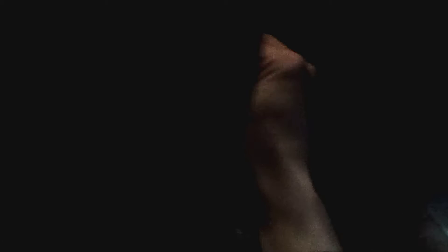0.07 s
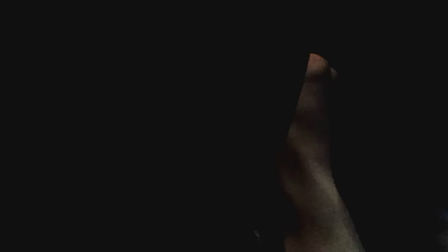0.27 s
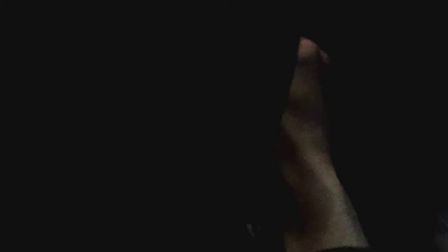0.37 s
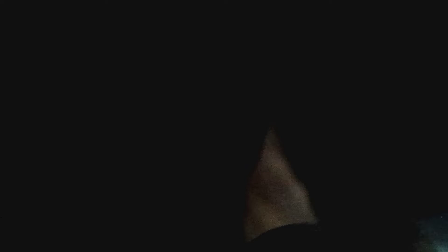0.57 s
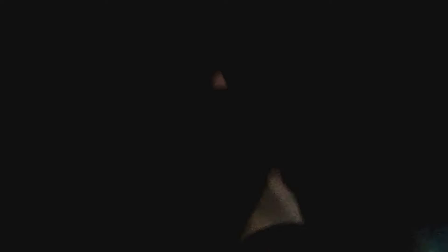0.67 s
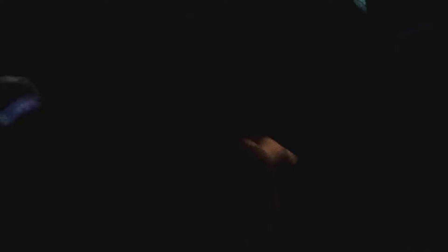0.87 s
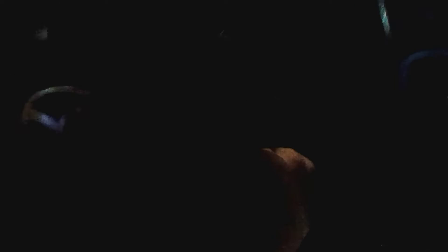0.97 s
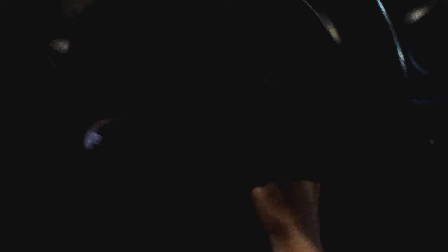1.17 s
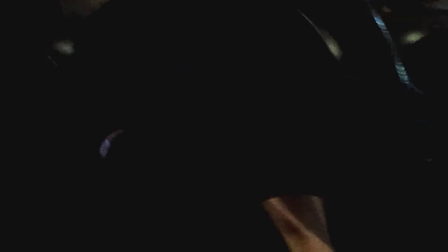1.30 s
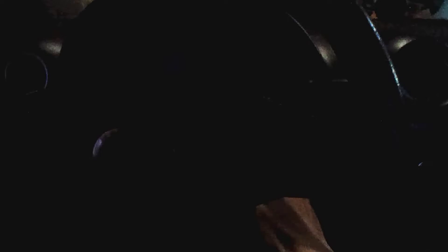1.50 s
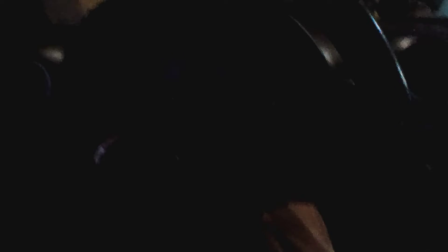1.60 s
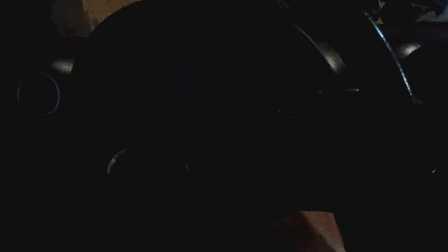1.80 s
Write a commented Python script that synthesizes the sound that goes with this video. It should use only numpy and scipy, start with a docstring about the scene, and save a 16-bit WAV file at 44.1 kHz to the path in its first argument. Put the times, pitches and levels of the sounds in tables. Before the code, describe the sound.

Keys click and jingle close to the microphone in a quiet parked car. A sleeve rustles, one key scrapes into the lock, then dull bumps, two sharp snaps and a last loose rattle follow.

```python
"""A faint sinking hum and the rustle of a sleeve open on keys handled close by in a parked car.
The keys click against the lock, each impact exciting crowded modes of metal and housing. One key
scrapes in by stick-slip friction while the others ring. Dull bumps on a damped panel follow, then
two sharp snaps and a last loose rattle over the hush of the cabin."""
import sys
import numpy as np
from scipy import signal
from scipy.fft import rfft, irfft
from scipy.io import wavfile

SR = 44100
rng = np.random.default_rng(int(sys.argv[2]) if len(sys.argv) > 2 else 0)


def put_to_file(sound):
    """Save the sound as 16-bit audio at rate SR, in the file named by the first command-line argument."""
    columns = np.atleast_2d(sound).T  # one column per channel
    safe = np.clip(columns, -1, 1)
    whole_steps = np.round(safe * 32767)
    wavfile.write(sys.argv[1], SR, whole_steps.astype(np.int16))


N = 81585
T = np.arange(N) / SR
HZ = np.fft.rfftfreq(N, 1 / SR)
EVENT_T = T[:SR // 4]  # time since an impact [s]


def amp(db):
    """Amplitude ratio of a level in decibels."""
    return 10 ** (np.asarray(db) / 20)

def decay(t60):
    """Exponential damping: 60 dB in t60 seconds."""
    return np.exp(-np.log(1000) * EVENT_T / t60)

def unit_rms(x):
    """Normalisation to unit power."""
    return x / np.sqrt(np.mean(x ** 2) + 1e-20)

def spectrum_db(table):
    """Interpolation of levels over logarithmic frequency."""
    hz, db = np.transpose(table)
    return np.interp(np.log(HZ + 1), np.log(hz + 1), db)

def envelope(table, column=1):
    """Amplitude envelope, interpolated in decibels."""
    rows = np.array(table)
    return amp(np.interp(T, rows[:, 0], rows[:, column]))

def add(mix, onset, sound):
    """Superposition of a sound at its onset time."""
    part = mix[:, round(onset * SR):][:, :sound.shape[-1]]
    part += sound[..., :part.shape[-1]]

def noise(spectrum, correlation=0.2):
    """Filtered Gaussian noise, partly coherent between the channels."""
    left, independent = rng.standard_normal((2, N))
    right = correlation * left + np.sqrt(1 - correlation ** 2) * independent
    return unit_rms(irfft(rfft(np.array([left, right])) * amp(spectrum_db(spectrum)), N))

def phase_drift(width_hz, shape):
    """Line broadening: a random walk of phase, in cycles, widens a tone to width_hz."""
    return np.cumsum(rng.standard_normal(shape), -1) * np.sqrt(width_hz / (2 * np.pi * SR))


def hum(start_hz=354.6, fall_hz_per_s=373, end_s=0.21):
    """A faint downward glide, roughened by phase noise, whose power falls linearly to zero."""
    cycles = np.cumsum(start_hz - fall_hz_per_s * T) / SR + phase_drift(22, N)
    tone = np.sqrt(np.clip(1 - T / end_s, 0, 1)) * np.sin(2 * np.pi * cycles)
    return amp(-47.5) * np.array([tone, tone])

# Motion of hand and sleeve (time [s], rumble level [dB], rustle level [dB])
HANDLING_LEVELS = [(0,-52,-53.5),(.10,-68,-50),(.25,-53,-52),(.45,-47.5,-50.5),(.62,-35,-47.5),(.73,-52.5,-55),(1.12,-45,-45),(1.40,-49,-55.5),(1.52,-65.5,-54.5),(1.64,-75,-56.5),(1.76,-53.5,-60),(1.85,-62,-57)]
# Envelope of the hiss (time [s], level [dB])
HISS_LEVELS = [(.3,-58.5),(1.1,-51.5),(1.28,-56),(1.41,-49),(1.55,-46),(1.62,-59.5)]
# Spectra of the cabin's noises (frequency [Hz], relative density [dB])
RUMBLE_SPECTRUM = [(30,-39),(45,-13.5),(90,3.5),(150,-5.5),(340,-11),(1200,-32)]
RUSTLE_SPECTRUM = [(100,11.5),(350,5),(2200,2.5),(4000,-12.5),(16000,-69)]
HISS_SPECTRUM = [(3000,-8.5),(6500,-7),(9300,5),(16000,-14)]

def cabin():
    """Amplitude-modulated noise: sleeve rustle, quiet hiss and handling rumble."""
    rustle = envelope(HANDLING_LEVELS, column=2) * noise(RUSTLE_SPECTRUM)
    hiss = envelope(HISS_LEVELS) * noise(HISS_SPECTRUM)
    rumble = envelope(HANDLING_LEVELS) * noise(RUMBLE_SPECTRUM)
    return rustle + hiss + rumble

def impact(t60, rise_s=0.0005):
    """Impact envelope: a quick rise, then free decay and the padded cabin's weak reverberation."""
    reverberation = amp(-18.5) * decay(t60=0.1)
    shape = (1 - np.exp(-EVENT_T / rise_s)) * np.hypot(decay(t60), reverberation)
    return shape / shape.max()

# Metal contacts (time [s], tick level [dB], clack level [dB], body level [dB])
CONTACTS = [(0.065,-27.5,-56,-47),(0.084,-40,-45,-38.5),(.212,-19.5,-47,-32),(0.328,-43,-51,-44.5),(0.354,-41,-55,-37.5),
            (.382,-27.5,-58,-34),(0.391,-18,-28.5,-23.5),(0.4716,-39,-24.5,-24),(0.474,-24,-38,-41),(0.483,-17,-23,-47),
            (0.503,-21.5,-24.5,-24.5),(0.528,-27,-28,-51),(0.574,-30,-31,-46),(0.638,-26,-26,-28.5),
            (0.756,-38,-49,-47),(0.83,-49,-68,-43),(0.992,-54,-40,-35),(1.021,-16,-28.5,-33),(1.061,-24,-40.5,-37.5),
            (1.1133,-16,-23,-27),(1.159,-14.5,-21,-26.5),(1.1627,-15,-20,-36.5),(1.181,-44,-46,-33.5),(1.206,-38,-53,-39.5),(1.268,-60,-68,-43.5),
            (1.336,-30.5,-44,-49),(1.351,-39,-57,-51),(1.364,-31.5,-46,-46.5),(1.441,-25,-44,-48),(1.487,-26,-39,-43.5),(1.507,-35,-42,-41),
            (1.5364,-43,-49,-32),(1.561,-33,-39,-42),(1.733,-43.5,-50.5,-50),(1.776,-44,-47.5,-44.5)]
# Spectra of the keys' bright tick and the lock's hard clack (frequency [Hz], relative density [dB])
TICK_SPECTRUM = [(3000,-87),(6500,-17),(8000,-7.5),(9300,1.5),(10600,-0.5),(12000,-8.5),(16000,-16)]
CLACK_SPECTRUM = [(1200,-38),(3000,1),(7000,4),(16000,-2)]

def clicks(chatter_db=4.5, chatter_s=0.0016):
    """Impacts excite modes of keys, lock and housing so crowded that they decay as bands of noise."""
    shapes = np.array([impact(t60=0.022), impact(t60=0.057), impact(t60=0.066, rise_s=0.00066)])
    power = np.zeros((3, N))  # incoherent contacts add in power
    for onset, *levels_db in CONTACTS:
        add(power, onset, (amp(levels_db)[:, None] * shapes) ** 2)
    tick, clack, body = np.sqrt(power)
    # Each contact is a spray of tiny bounces.
    pole = np.exp(-1 / (chatter_s * SR))
    spray = unit_rms(signal.lfilter([1], [1, -pole], rng.standard_normal(N)))
    chatter = unit_rms(amp(chatter_db * np.clip(spray, -2, 2)))
    metal = tick * noise(TICK_SPECTRUM) + clack * noise(CLACK_SPECTRUM)
    return chatter * metal + body * housing()

# Broad spectrum of the lock's plastic housing (frequency [Hz], relative density [dB])
BODY_SPECTRUM = [(200,-17),(520,-5),(1200,-1.5),(2600,-1),(3600,-8.5),(16000,-88)]
# Its resonances (frequency [Hz], boost [dB])
HOUSING_RESONANCES = [(755,9.5),(1010,4.5),(1230,6.5),(1620,7.5),(2350,-8.5),(2640,4)]

def housing(width_hz=55):
    """Resonance of the hollow housing colours noise with narrow peaks and one dip."""
    boost_db = sum(db / (1 + (2 * (HZ - hz) / width_hz) ** 2) for hz, db in HOUSING_RESONANCES)
    return unit_rms(irfft(rfft(noise(BODY_SPECTRUM)) * amp(boost_db), N))

# The key sliding in (time [s], grit level [dB], body level [dB])
SCRAPE_LEVELS = [(.455,-45,-56.5),(.485,-19,-20),(.508,-31,-47),(.522,-32,-45),(.553,-36,-40),(.568,-24.5,-35),(.598,-26.5,-35.5),(.614,-28.5,-30),(.632,-23,-30.5),(.660,-53,-41),(.69,-53,-46.5),(.74,-55,-54)]

def scrape(slips_per_s=1200, spread_db=3.3):
    """Stick-slip friction: the key's teeth drag over the pins in a dense run of tiny slips."""
    slipping = rng.random(N) < slips_per_s / SR
    slips = slipping * amp(spread_db * np.minimum(rng.exponential(1, N), 3))
    power = signal.fftconvolve(slips ** 2, decay(t60=0.018) ** 2)[:N]
    grit = unit_rms(np.sqrt(abs(power)))
    sliding = (T > SCRAPE_LEVELS[0][0]) & (T < SCRAPE_LEVELS[-1][0])
    bright = envelope(SCRAPE_LEVELS) * noise(TICK_SPECTRUM)
    body = envelope(SCRAPE_LEVELS, column=2) * (housing() + amp(-4.5) * noise(CLACK_SPECTRUM))
    return sliding * grit * (bright + body)

# Strikes on metal parts (time [s], level [dB], part [index])
STRIKES = [(0.465,-42,1),(.476,-18.5,1),(0.528,-14,0),(.534,-14.5,0),(.556,-27,0),(.567,-30,5),(0.754,-36,0),(.832,-40.5,5),(0.883,-31.5,0),(1.024,-44,4),(1.114,-20.5,2),(1.163,-15,3),(1.352,-35.5,4),(1.453,-27.5,4),(1.486,-32,2),(1.559,-41,4)]
# Modes of parts 0-5: three keys, latch, key ring, lock barrel (frequency [Hz], relative level [dB])
PART_MODES = [
    [(7957,-10.5),(8440,-11),(10680,-9),(11630,-6),(12915,-6)],
    [(2630,-3.5),(3780,-11.5),(4830,-3),(8550,-5),(9000,3.5),(9440,-1),(10670,1.5)],
    [(2363,-10.5),(8420,-3.5),(8800,-2),(12330,-5)],
    [(3085,-13.5),(4380,-5.5),(9600,-1.5)],
    [(5680,-13),(10440,-5.5),(13230,-7),(14980,-5)],
    [(750,0.5),(4700,-20)],
]
# Damping of each part (60 dB decay time [s])
PART_T60 = [0.047,0.062,0.073,0.031,0.088,0.11]

def jingle(blur_hz=45, spread_db=1.5):
    """Free vibration: struck metal rings in its modes, each broadened by rubbing on neighbours."""
    out = np.zeros((2, N))
    for onset, db, part in STRIKES:
        hz, mode_db = np.array(PART_MODES[part]).T[:, :, None]
        drift = phase_drift(blur_hz, (len(hz), len(EVENT_T)))
        cycles = hz * EVENT_T + drift + rng.random((2, len(hz), 1))
        gains = amp(mode_db + spread_db * rng.standard_normal(hz.shape))
        ring = (gains * np.sin(2 * np.pi * cycles)).sum(1)
        add(out, onset, amp(db) * impact(PART_T60[part]) * ring)
    return out

# Soft knocks (time [s], level [dB], frequency factor [ratio])
KNOCKS = [(.944,-20.5,1.02),(0.9528,-11.5,1.06),(0.9667,-18,0.93),(1.004,-17,1.18),(1.024,-27,0.99),(1.037,-17.5,1.036),(1.0565,-21.5,1.21),(1.065,-22.5,1.07),(1.089,-29.5,1.75),(1.567,-34.5,0.8)]
# Modes of the panel (base frequency [Hz], relative level [dB], 60 dB decay time [s])
PANEL_MODES = [(91.9,-2,0.09),(139,3.5,0.065),(227.3,-6.5,0.057),(323,-13,0.04)]

def bumps(rise_s=0.0019):
    """Soft impacts excite the low modes of a heavily damped panel."""
    out = np.zeros((2, N))
    attack = (1 - np.exp(-EVENT_T / rise_s)) ** 2
    for onset, db, pitch in KNOCKS:
        ring = sum(amp(mode_db) * decay(t60) * np.sin(2 * np.pi * hz * pitch * EVENT_T)
                   for hz, mode_db, t60 in PANEL_MODES)
        add(out, onset, amp(db) * attack * ring)
    return out * amp([[0], [-10]])  # weaker on the right

def dashboard(x, count=5, echo_db=-3, span_s=0.006):
    """Comb filtering: close reflections off dashboard and wheel interfere with the direct sound."""
    delays = span_s * rng.random((2, count, 1))
    signs = np.sign(rng.standard_normal((2, count, 1)))
    reflections = signs * np.exp(-2j * np.pi * HZ * delays)
    echoes = amp(echo_db) * reflections.sum(1) / np.sqrt(count)
    return irfft(rfft(x) * (1 + echoes) / np.hypot(1, amp(echo_db)), N)

# Balance of the two microphone ports (frequency [Hz], left minus right level [dB])
PORT_BALANCE = [(100,12.5),(250,14.5),(500,13),(2200,13),(4000,-0.5),(8000,-4.5),(13000,-14.5)]

def ports(x, left_delay_s=0.0004863):
    """Level and time differences: the left port favours bass; the right, treble, and hears first."""
    balance_db = spectrum_db(PORT_BALANCE)
    left = amp(np.minimum(balance_db, 0)) * np.exp(-2j * np.pi * HZ * left_delay_s)
    right = amp(np.minimum(-balance_db, 0))
    return irfft(rfft(x) * np.array([left, right]), N)

def scene():
    """Superposition of keys, lock, panel and cabin at the microphone."""
    return ports(dashboard(clicks() + scrape()) + jingle() + bumps() + cabin() + hum())

def record(dry, low_hz=36, high_hz=15850):
    """Band limiting: the recorder cuts the deepest bass and the highest treble."""
    highpass = signal.butter(4, low_hz, "highpass", fs=SR, output="sos")
    lowpass = signal.firwin(301, high_hz, window=("kaiser", 8), fs=SR)
    return signal.oaconvolve(signal.sosfilt(highpass, dry), lowpass[None], "same")


dry = scene()
out = record(dry)
put_to_file(out)
```